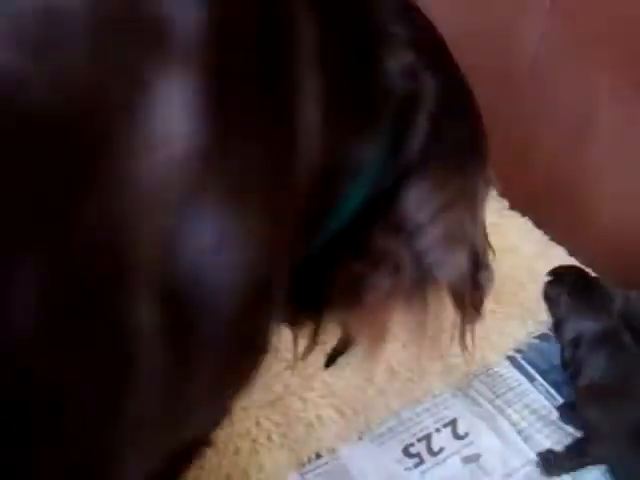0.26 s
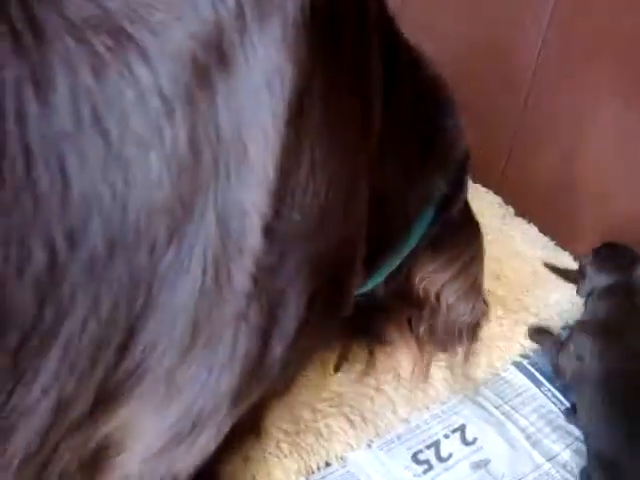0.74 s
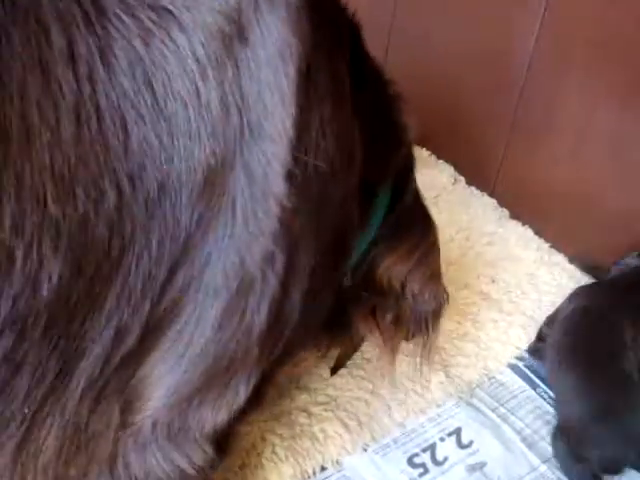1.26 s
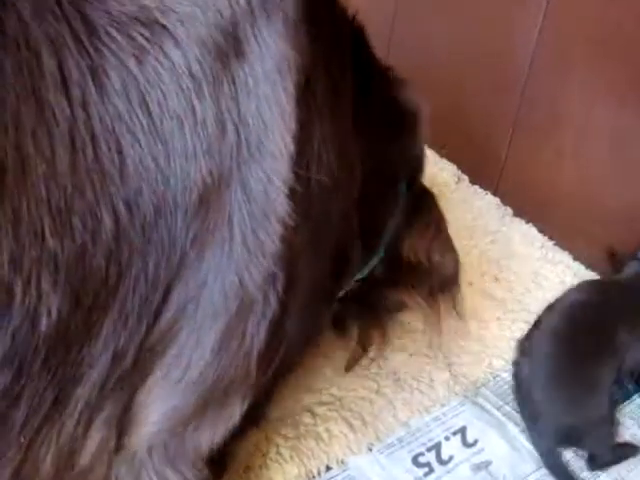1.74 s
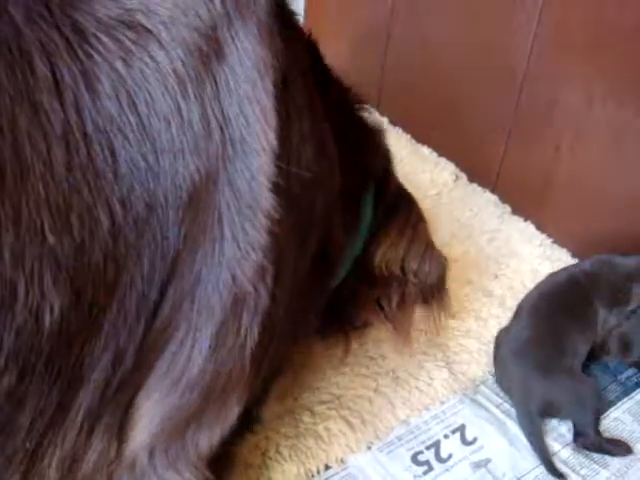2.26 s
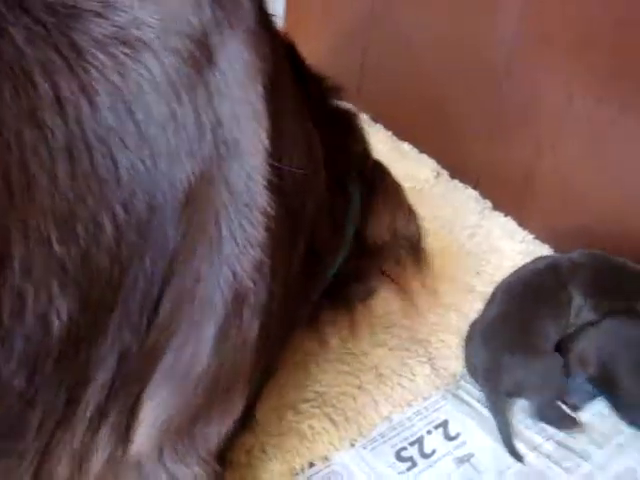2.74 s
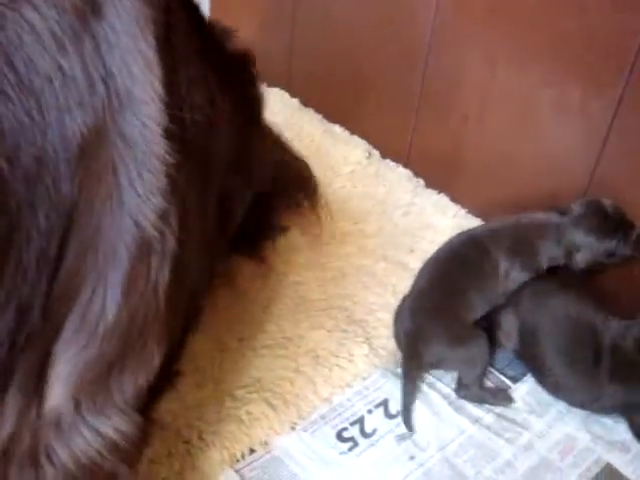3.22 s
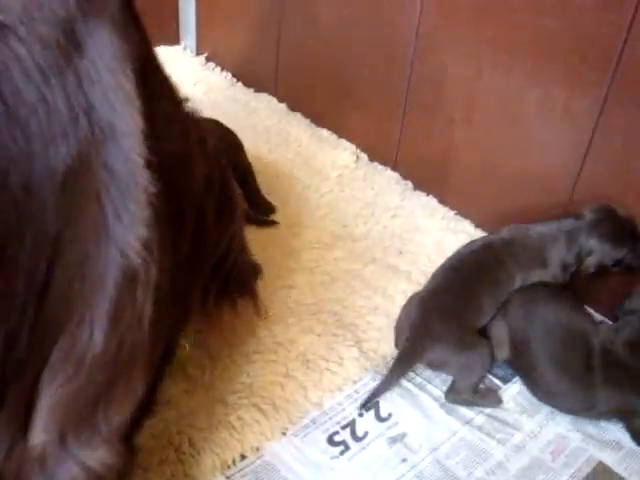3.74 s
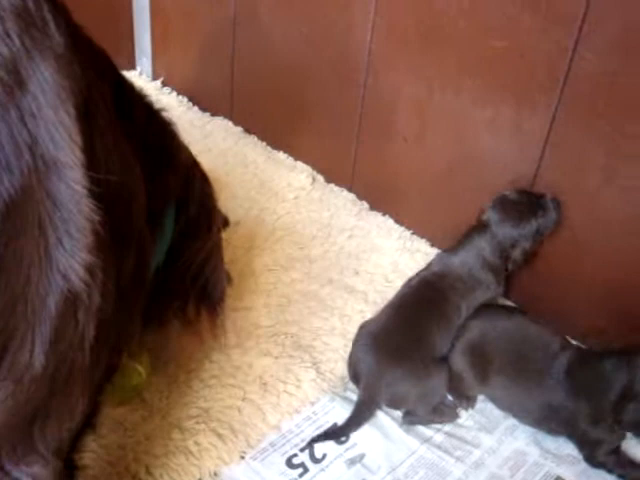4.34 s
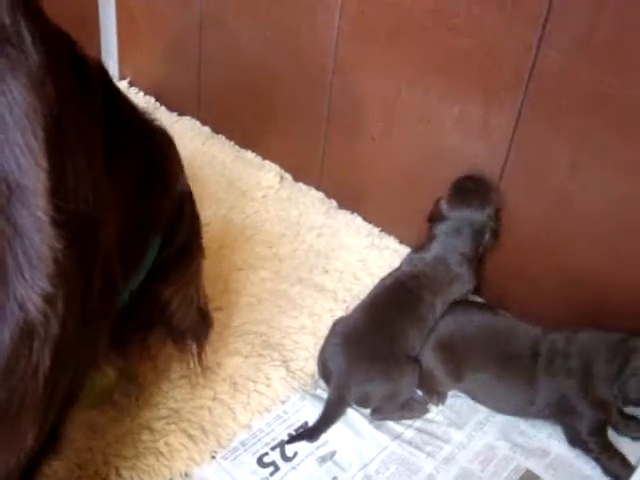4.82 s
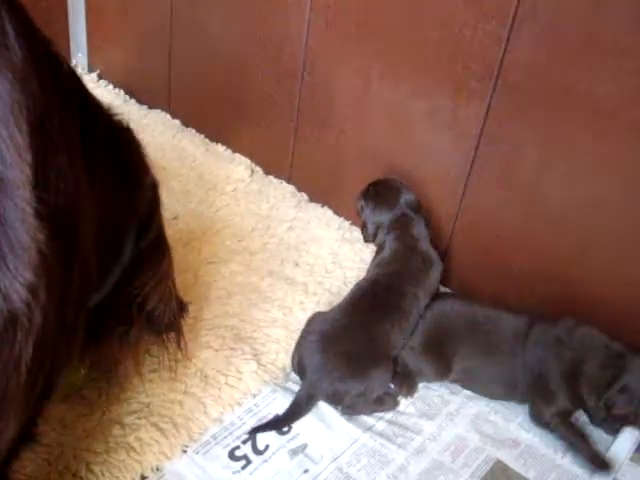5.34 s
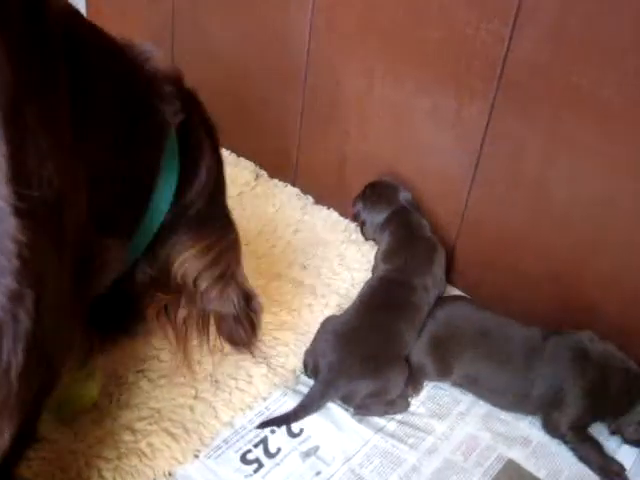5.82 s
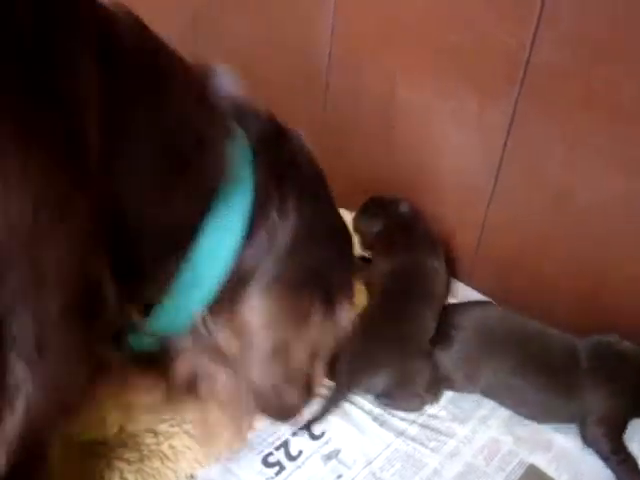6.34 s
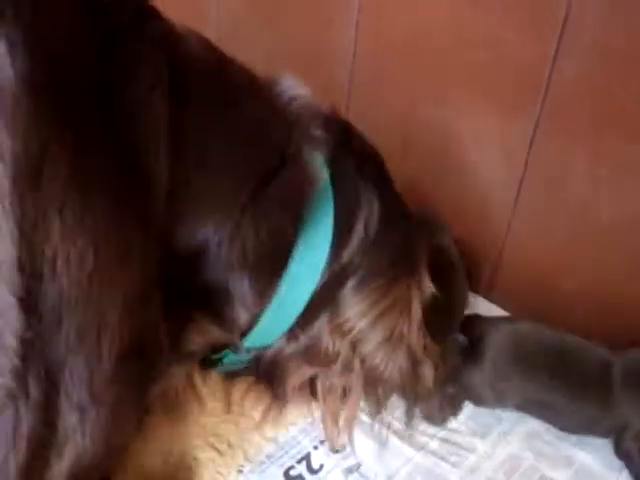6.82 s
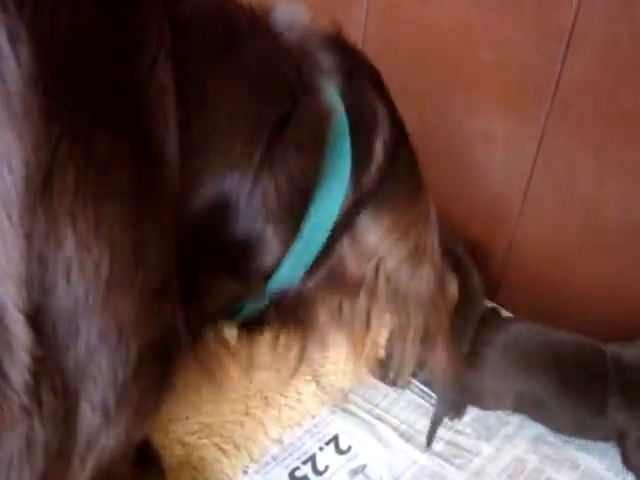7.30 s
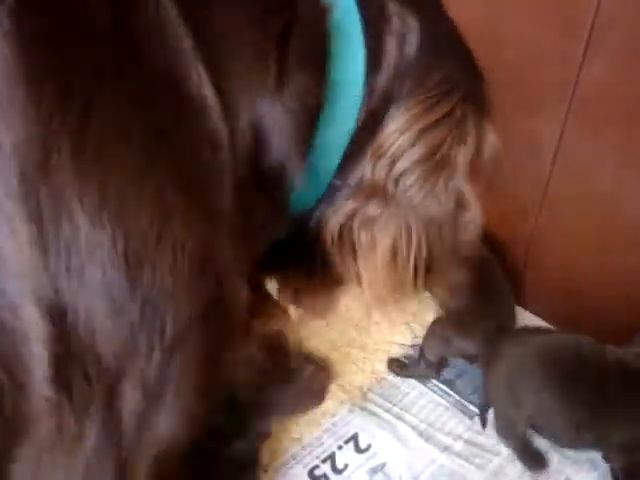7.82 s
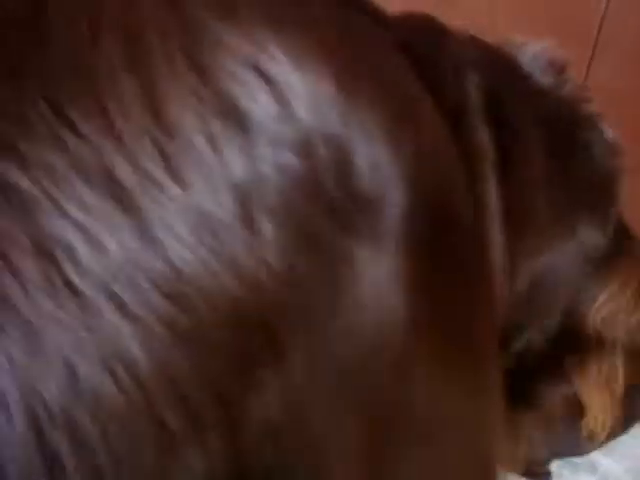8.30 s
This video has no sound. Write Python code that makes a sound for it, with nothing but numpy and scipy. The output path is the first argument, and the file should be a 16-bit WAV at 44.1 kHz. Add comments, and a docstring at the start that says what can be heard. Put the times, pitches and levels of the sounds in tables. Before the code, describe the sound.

A close, slightly hissy indoor recording of a puppy litter on fleece and newspaper. It starts with fabric scuffs and sparse, quiet squeaks and sagging whines, thickening into an almost continuous run of short squeals, some low and nasal, some high. Small grunts and wet tongue smacks fall between. After a short lull, three strained yelps burst out in quick succession, followed by a sharp lick and more small squeaks, with a short room echo.

```python
"""Newborn puppies squeal, whine and grunt on a fleece rug and newspaper in a small, hard-floored room.
A squeal slides up to a crest, a whine sags in two steps, and loud yelps turn hoarse with effort.
Voices are sums of vocal-fold partials shaped by the throat, plus a hiss of forced air.
Their mother licks and noses them: wet smacks, scuffs and rustling bedding, all made of shaped noise.
Decaying noise answers for the walls, over still-room noise and hiss."""
import sys
import numpy as np
from scipy import signal
from scipy.fft import rfft, irfft, next_fast_len
from scipy.io import wavfile
from scipy.ndimage import uniform_filter1d, map_coordinates

SR = 44100
rng = np.random.default_rng(int(sys.argv[2]) if len(sys.argv) > 2 else 0)


def to_wav(s):
    """Save 16-bit WAV."""
    ch = np.atleast_2d(s).T  # columns
    pcm = np.round(np.clip(ch, -1, 1) * 32767)  # PCM
    wavfile.write(sys.argv[1], SR, pcm.astype(np.int16))


N = 377496
TOP_HZ = 10200  # upper band limit


def amp(db):
    """Decibels to gain."""
    return 10 ** (np.asarray(db) / 20)


def unit(x):
    """Scaled to rms 1."""
    return x / np.sqrt(np.mean(x ** 2) + 1e-20)


def along(points, hz):
    """(Hz, value) points read on a log frequency axis."""
    point_hz, value = np.transpose(points)
    return np.interp(np.log(hz + 1), np.log(point_hz + 1), value)


def wobble(knots_per_s, size):
    """A smooth random curve through normal-distributed knots."""
    knots = rng.standard_normal(int(size * knots_per_s / SR) + 4)
    return map_coordinates(knots, [np.arange(size) * knots_per_s / SR])


def spread(knots, size):
    """Rows of knots joined by straight lines over size samples."""
    at = np.linspace(0, knots.shape[1] - 1, size, endpoint=False)
    left = at.astype(int)
    return knots[:, left] + np.diff(knots)[:, left] * (at - left)


def filtered(x, response):
    """x times a gain that depends on frequency."""
    size = next_fast_len(len(x) + 4096)
    hz = np.fft.rfftfreq(size, 1 / SR)
    return irfft(rfft(x, size) * response(hz), size)[:len(x)]


def noise(response, size):
    """Coloured noise of rms 1."""
    return unit(filtered(rng.standard_normal(size), response))


def hump(centre_hz, q):
    """The gain of one broad resonance."""
    return lambda hz: 1 / (1 + (q * (hz / centre_hz - centre_hz / (hz + 1))) ** 2)


def add(track, start_s, sound):
    """Mixes a sound into the track, cropped to its ends."""
    start = round(start_s * SR)
    sound = sound[max(-start, 0):N - start]
    track[max(start, 0):][:len(sound)] += sound


def span(start_s, length_s):
    """The sample times of a call with small margins, and its progress from 0 to 1."""
    t = np.arange(start_s - .003, start_s + length_s + .004, 1 / SR)
    return t, np.linspace(0, 1, len(t))


# throat colour, mouth half open: freq_hz, relative_db
HALF_OPEN_THROAT = [(200,2),(400,-5.5),(750,3),(1100,-1),(1350,-2),(1650,-1.5),(2000,-13.5),(2500,-26),(3300,-31),(4400,-39),(5700,-18.5),(7200,-29),(9200,-21),(10200,-45)]
# throat colour, mouth gaping in a scream: freq_hz, relative_db
GAPING_THROAT = [(600,9.5),(1100,5),(1550,-1),(2000,-1.5),(2600,8),(3300,-41.5),(4200,-29),(5200,-12),(7000,-25),(9500,-28)]


def cry(t, pitch_hz, level_db, bright_db_oct, rough, jitter, uneven_db, air_db, edge_s, hiss_db,
        whistle_db=-5):
    """One call: the partials of the vocal folds, shaped by the throat, and the hiss of forced air."""
    size = len(t)
    # muscles take time
    pitch_hz = uniform_filter1d(pitch_hz, size=600)
    effort = uniform_filter1d(amp(level_db), size=600)
    # the folds start with a rasp
    rough = np.maximum(rough, .1 + .4 * np.exp((t[0] - t) / .022))
    phase = 2 * np.pi * np.cumsum(pitch_hz * (1 + jitter * wobble(140.3, size))) / SR
    order = np.arange(1, TOP_HZ / pitch_hz.min(), .5)[:, None]
    between = order % 1 > 0  # uneven closing of the folds fills the gaps between harmonics

    def chance(knots_per_s):
        """A row of random knots for each partial."""
        return rng.standard_normal((len(order), int(knots_per_s * size / SR) + 2))

    # throat colour, worked out every 64 samples
    f0, tilt, strain = (np.broadcast_to(curve, size)[::64] for curve in (pitch_hz, bright_db_oct, rough))
    hz = order * f0
    gape = np.clip((strain * f0 / 540) ** 2, 0, 1)  # high, strained cries open the mouth wide
    octaves = np.log2(np.minimum(hz, 1800) / np.minimum(f0, 1800))
    half_open_db = along(HALF_OPEN_THROAT, hz) + tilt * octaves
    # high notes: soft ones near a whistle, forced ones ring
    half_open_db += whistle_db * np.clip(f0 / 700 - .5, 0, 1) * (hz > 3000)
    colour_db = (1 - gape) * half_open_db + gape * along(GAPING_THROAT, hz)
    gain = amp(colour_db + uneven_db * spread(chance(25), len(f0)))
    gain *= np.where(between, amp(air_db) + strain ** 1.5, 1)
    gain /= np.linalg.norm(gain, axis=0)

    # strain smears each harmonic, the high ones most
    harmonic_smear = rough * (.9 * np.minimum(order, 3) + order * pitch_hz.mean() / 1700)
    smear = np.where(between, 2, harmonic_smear)
    drift = smear * spread(chance(.35 * pitch_hz.mean()), size) + rng.uniform(0, 2 * np.pi, order.shape)
    angle = (order * phase % (2 * np.pi) + drift).astype(np.float32)
    tone = np.sqrt(2) * np.sum(spread(gain, size) * np.sin(angle), 0)

    # high notes are forced hardest
    forcing = effort * rough * (pitch_hz / 1200) ** 1.5
    hiss = amp(hiss_db) * forcing * noise(hump(4650, 1.7), size)
    gate = np.clip((t - t[0]) / edge_s, 0, 1) * np.clip((t[-1] - t) / edge_s, 0, 1)
    catches = 1 + .5 * rough * wobble(170, size)  # a hoarse voice sputters
    return gate * effort * catches * (tone + hiss)


def puppy(shape, calls, gain_db, **voice):
    """Every call of one kind: its shape gives the pitch, level, brightness and roughness."""
    track = np.zeros(N)
    for row in calls:
        t, *controls = shape(*row)
        add(track, t[0], cry(t, *controls, **voice))
    return amp(gain_db) * track


# squeals, and the last yelp's thin, high tail (rows 7.619, 7.675, 7.762), level before voice gain:
# start_s, rise_s, length_s, first_hz, crest_hz, last_hz,
# level_db, swell_db, bright_db_oct, rough (0-1, at the crest)
SQUEAL_CALLS = [ (0,0.022,0.072,501,518,478.4,-21.5,-13.5,-3.5,0.58),
                (0.322,0.073,0.12,789,982,933,-28.5,1,-11.5,0.2),
                (0.833,.035,0.057,732,818,822,-27.5,7,-20,.1),
                (1.489,0.013,0.082,950,952,912,-28,4,-17.5,0.2),
                (1.924,.04,.048,760,860,914,-18,6,-9.5,.15),
                (1.968,.025,0.086,997,1185,990,-17,-6.5,-5,0.41),
                (2.066,.045,0.071,369,419.4,432.6,-17,-10.5,-3.5,0.09),
                (2.14,0.035,0.077,814,826,727,-25,6,-8,0.2), (2.333,0.039,0.055,367,426,437,-16,-4,-2,0.08),
                (2.561,0.023,0.054,823,791,795,-21.5,2,-11,.1),
                (2.601,0.037,0.079,361.3,501,483,-13.5,0.5,-2,0.4),
                (2.9,.06,.12,366.4,386.6,397.6,-13.5,-0.5,-1.5,0.49),
                (3.041,0.061,0.076,577.4,643,636,-18.5,10.5,-3.5,0.4),
                (3.206,0.048,.08,351,375,374,-20.5,0,-7.5,0.82),
                (3.31,0.1,.12,403.4,439.6,430,-20.5,-3,-4,.1),
                (3.435,0.056,0.063,367.7,450.2,443.3,-15.5,5.5,-1,0.43),
                (3.635,0.054,0.073,336,370.3,385,-19.5,1,-1,0),
                (3.733,.035,0.053,378.4,442,443,-18.5,-3,-0.5,0.3),
                (4.012,0.031,.06,736.5,822,811,-13,4.5,-2,.1),
                (4.052,0.054,.076,536.4,600.6,608,-15.5,-2.5,0.5,0.28),
                (4.311,0.061,0.083,543,560.6,580,-17.5,-4.5,1,.17),
                (4.37,0.068,.08,730,930,880,-18.5,-11.5,-4,0.3),
                (4.59,.11,0.17,419.3,486.6,328.4,-19,5,-2.5,.12),
                (4.776,.045,.055,715,794,813,-14,-2,-2.5,0.3),
                (4.948,0.1,0.15,264,464,395.4,-24,9.5,-1.5,0.3),
                (5.114,0.036,0.053,392,503,499,-16.5,-3.5,-2,0.43),
                (5.385,.03,.07,295.3,367.6,345.4,-19,9,-3,.3),
                (5.64,0.088,0.12,722,1124,1119,-11.5,5,-1.5,0.17),
                (5.942,.03,0.033,744,688,687,-17,-7.5,-1,.15),
                (5.977,.05,0.12,715,874.7,842.6,-11,-4.5,-2.5,0.28),
                (6.238,0.044,.062,452.4,467.6,474,-16,1,-1.5,.1),
                (7.619,.02,.055,1231,1200,1213,-21.5,-11,4.5,.15),
                (7.675,.065,0.095,1226,1248,1240,-28,2,16,.1),
                (7.762,.015,0.029,1240,1176,1165,-23.5,1.5,7,.1),
                (7.89,0.068,0.12,353.3,544.6,561.5,-17,10,-0.5,0.1),
                (8.022,0.043,0.069,579,711.5,715,-17.5,4.5,3,0.26),
                (8.289,0.022,0.027,685,724,716,-17,4,-7,.1), (8.319,0.037,0.048,428,552,578,-17,3,2,.45),
                (8.364,0.034,0.087,665,747,705,-14.5,-4.5,-3.5,0.19)]
ARCH_DB = 4.5  # weaker by this at both ends
OPENING_DB_OCT_PER_DB = 0.36  # a louder moment is brighter
GLIDE_LAG = 1.3  # above 1, the pitch lingers before it climbs
STRAIN_START = 0.37  # share of the roughness present before the crest


def squeal(start_s, rise_s, length_s, first_hz, crest_hz, last_hz, level_db, swell_db, bright_db_oct, rough):
    """Pitch slides up to a crest of greatest strain, then drifts to its last value; the level arches."""
    t, u = span(start_s, length_s)
    climb = np.sin(np.pi / 2 * np.clip((t - start_s) / rise_s, 0, 1) ** GLIDE_LAG) ** 2
    after = np.clip((t - start_s - rise_s) / max(length_s - rise_s, .005), 0, 1)
    pitch_hz = first_hz + (crest_hz - first_hz) * climb + (last_hz - crest_hz) * after
    push_db = swell_db * (u - .5) - ARCH_DB * (2 * u - 1) ** 2
    strain = rough * (STRAIN_START + (1 - STRAIN_START) * climb)
    return t, pitch_hz, level_db + push_db, bright_db_oct + OPENING_DB_OCT_PER_DB * push_db, strain


# bedding under shifting bodies, level before a fixed trim: time_s, level_db
RUSTLE_LEVEL = [(0.0, -34.5), (0.19, -39), (0.71, -45), (1.19, -48.5), (1.52, -44), (2.6, -53), (2.74, -44),
                (3.6, -49.5), (3.74, -51.5), (5.65, -45), (5.91, -52.5), (6.2, -41), (6.39, -48.5),
                (6.89, -53.5), (7.41, -38.5), (7.82, -48.5), (8.25, -40.5), (8.56, -43.5)]
# bedding spectrum, relative: freq_hz, density_db (per Hz)
BEDDING_SPECTRUM = [(59,-42.5),(100,-7),(156,-24.5),(233,-2.5),(424,-11.5),(1050,-0.5),(1180,-5),(1770,-4.5),(2180,-7.5),(5940,-5),(10000,-11),(13000,-45),(22000,-120)]


def bedding():
    """Fleece and newspaper rustle in clumps of tiny crackles."""
    level_db = np.interp(np.arange(N) / SR, *np.transpose(RUSTLE_LEVEL))
    clumps = amp(3.3 * wobble(30, N) + 2.8 * wobble(600, N))
    fibres = noise(lambda hz: amp(along(BEDDING_SPECTRUM, hz)), N)
    return amp(level_db + 2.5) * unit(clumps * fibres)


# still-room and microphone-hiss spectrum, relative: freq_hz, density_db (per Hz)
STILL_SPECTRUM = [(15,-46.5),(25,-38),(152,7.5),(292,24.5),(603,18.5),(775,26.5),(1600,10.5),(2340,16),(4160,-7.5),(5760,-51),(7780,-10),(10000,-62.5),(22000,-120)]


def still_room():
    """Steady coloured noise of the still room and microphone hiss."""
    return amp(-51) * noise(lambda hz: amp(along(STILL_SPECTRUM, hz)), N)


# wall decay: freq_hz, t60_s
WALL_DECAY = [(200,0.41),(550,0.25),(1400,.24),(4000,0.2),(10000,.21)]


def room(x, wet_db, delay_s):
    """The walls' answer, decaying noise that keeps changing as the animals move."""
    out, t = np.zeros(N), np.arange(N) / SR
    # a fresh tail every 0.5 s, cross-faded
    for centre_s in np.arange(0, t[-1] + .5, .5):
        hz, age_s, z = signal.stft(rng.standard_normal(SR // 2), SR, nperseg=256)
        decay = amp(-60 * age_s / along(WALL_DECAY, hz)[:, None])
        tail = signal.istft(z * decay, SR, nperseg=256)[1]
        near = np.abs(t - centre_s) < .5
        part = x[near] * np.cos(np.pi * (t[near] - centre_s))
        add(out, t[near][0] + delay_s, signal.fftconvolve(part, tail / np.linalg.norm(tail)))
    return amp(wet_db) * out


# short noise sweeps: scuffs on the bedding as the mother noses the pups, two of them during the yelps (6.861,
# 7.25): # start_s, length_s, level_db, centre_hz
NOISE_SWEEPS = [(.125,0.047,-25.5,1400),(.127,0.041,-32,5600),(0.225,.05,-24.5,4540),(.227,0.06,-30.5,312),(0.263,0.071,-29.5,6200),(0.284,0.037,-27,2300),(0.71,.043,-36.5,166),(0.341,.1,-35,4970),(1.345,0.046,-28,6730),(2.653,0.048,-36,4900),(6.861,0.053,-27.5,5540),(7.25,.045,-25,6000),(7.79,0.054,-32.5,3920),(7.962,0.056,-29,4950)]


def scuffs():
    """Each noise sweep swells fast, fades more slowly and flickers in level."""
    track = np.zeros(N)
    for start_s, length_s, level_db, centre_hz in NOISE_SWEEPS:
        u = np.linspace(0, 1, int(length_s * SR))
        flicker = amp(2.5 * wobble(400, len(u)))
        grain = unit(noise(hump(centre_hz, 0.88), len(u)) * flicker)
        add(track, start_s, amp(level_db) * np.sin(np.pi * u ** 0.72) * grain)
    return track


# falling whines, level before voice gain: start_s, length_s, first_hz, last_hz, level_db
WHINE_CALLS = [(0.433,0.14,628.5,364.5,-29.5),(.895,0.31,621,341.6,-29.5),(1.588,0.11,739,402.5,-27.5),(3.131,0.076,452,342.4,-24),(3.518,0.11,467.4,408,-27)]
# drop, ledge, drop: length_share (0-1), fall_share (0-1)
WHINE_FALL = [(0,0),(.22,0.28),(.7,.44),(1,1)]


def whine(start_s, length_s, first_hz, last_hz, level_db):
    """A smooth, soft voice that sags in pitch and fades as the air runs out."""
    t, u = span(start_s, length_s)
    fall = np.interp(u, *np.transpose(WHINE_FALL))
    pitch_hz = first_hz * (last_hz / first_hz) ** fall
    return t, pitch_hz, level_db - 3 * fall, -5.5, 0


# licks and smacks, levels before fixed trims: start_s, level_db, body_db, middle_db, t60_s
LICK_SMACKS = [(0.7012,-23,6,10.5,0.047),(1.8184,-25,-7,2,0.19),(2.2638,-21.5,-24,-14.5,0.081),(2.5332,-13.5,-6,1,0.089),(2.812,-19.5,-6,4.5,0.047),(4.387,-15.5,-21,-10,.075),(5.1844,-21.5,-24,-7.5,0.056),(5.3692,-14,-6,-3,0.079),(5.9705,-27,0,-0.5,.1),(6.671,-29,4,12,0.058),(8.0155,-7,-2.5,-1.5,.11),(8.1549,-21,-13.5,-20,.18)]


def smacks():
    """The tongue lets go with a snap and a short wet crackle."""
    track, t = np.zeros(N), np.arange(SR // 3) / SR
    for start_s, level_db, body_db, middle_db, t60_s in LICK_SMACKS:
        burst = noise(hump(4700, 0.8), len(t))
        burst += amp(middle_db) * noise(hump(2610, 0.74), len(t))
        burst += amp(body_db - 1.5) * noise(hump(480, 0.59), len(t))
        crackle = amp(2.44 * wobble(700, len(t)))
        envelope = amp(level_db - 9.5 - 60 * t / max(t60_s, .01)) * (1 - np.exp(-t / .001))
        add(track, start_s, envelope * crackle * burst)
    return track


# closed-mouth grunts, level before voice gain: start_s, length_s, pitch_hz, level_db, swell_db, rough (0-1)
GRUNT_CALLS = [(1.298,.045,290,-35,-7,0.42),(1.835,0.051,331.7,-29.5,-3.5,0.85),(2.823,0.029,302,-31.5,0,0.7),(3.871,.145,264.8,-37,12,.1),(4.285,0.064,264,-38.5,-7,.1)]


def grunt(start_s, length_s, pitch_hz, level_db, swell_db, rough):
    """A low, dull hum that barely rises in pitch."""
    t, u = span(start_s, length_s)
    return t, pitch_hz * (1 + .04 * (u - .5)), level_db + swell_db * (u - .5), -6.5, rough


# loud yelps, one curve each; the last one's thin, high tail is three rows among the squeals;
# level before voice gain: time_s, pitch_hz, level_db, bright_db_oct
YELP_CURVES = [
    [(6.822, 466.3, -22, -2.5), (6.84, 469.5, -21.5, -1), (6.87, 779.3, -8.5, -2.5),
     (6.882, 842, -14.5, -6.5), (6.9, 1009, -6, -10), (6.908, 948.4, -9, -11), (6.924, 776, -13, -5.5),
     (6.936, 697.4, -15.5, 2), (6.965, 708, -21.5, 1)],
    [(7.124, 493.2, -27, -0.5), (7.154, 512, -17.5, -1), (7.168, 630, -30, -3.5), (7.184, 760.6, -8, -4),
     (7.216, 797, -16, 1.5), (7.242, 1014, -10.5, -4.5), (7.276, 1088, -28.5, 2), (7.286, 1089, -12.5, 0),
     (7.305, 1083, -23.5, -6)],
    [(7.469, 729, -19.5, 2.5), (7.487, 740, -10.5, 1.5), (7.499, 945, -12.5, 0), (7.531, 1522, -10, -2),
     (7.541, 1539, -11, 9), (7.563, 1523, -8, -8.5), (7.591, 1367, -14.5, 0), (7.625, 1275, -17, 1),
     (7.63, 1274, -18.5, -1)],
]
YELP_ROUGH, YELP_FULL_DB = 0.34, -10.5  # base roughness, level of full effort


def yelp(*points):
    """A wide, loud cry that grows hoarser the harder and longer it is pushed."""
    time_s, *columns = np.transpose(points)
    t, u = span(time_s[0], time_s[-1] - time_s[0])
    pitch_hz, level_db, bright_db_oct = (np.interp(t, time_s, column) for column in columns)
    push = np.sqrt(np.minimum(amp(level_db - YELP_FULL_DB), 1))
    return t, pitch_hz, level_db, bright_db_oct, YELP_ROUGH * push * (0.67 + 0.53 * u)


def scene():
    """The litter and their mother in the room."""
    voices = puppy(squeal, SQUEAL_CALLS, gain_db=-3, jitter=0.01285, uneven_db=4.5, air_db=-40,
                   edge_s=0.007, hiss_db=-6.5)
    voices += puppy(whine, WHINE_CALLS, gain_db=-3.5, jitter=0.017, uneven_db=-0.4, air_db=-32,
                    edge_s=0.0061, hiss_db=-12)
    voices += puppy(grunt, GRUNT_CALLS, gain_db=3, jitter=.018, uneven_db=6, air_db=-30,
                    edge_s=.012, hiss_db=-8)
    voices += puppy(yelp, YELP_CURVES, gain_db=-1.5, jitter=0.014, uneven_db=4.5, air_db=-25.5,
                    edge_s=0.0063, hiss_db=-2.5, whistle_db=2)
    voices = filtered(voices, lambda hz: hz ** 4 / (hz ** 4 + 190 ** 4))  # tiny mouths radiate no bass
    direct = voices + smacks() + scuffs()
    return (direct + room(direct, wet_db=-4.5, delay_s=.004) + bedding() + still_room())[None]


def record(dry):
    """The input rounds off the loudest peaks, a little unevenly, and keeps nothing above its band limit."""
    rounded = dry[0] / (1 + np.abs(dry[0] / .76) ** 6) ** (1 / 6)
    uneven = rounded + 0.035 * rounded ** 2
    return filtered(uneven, lambda hz: (hz < TOP_HZ) * hz / (hz + 25))[None]


dry = scene()
out = record(dry)
to_wav(out)
```